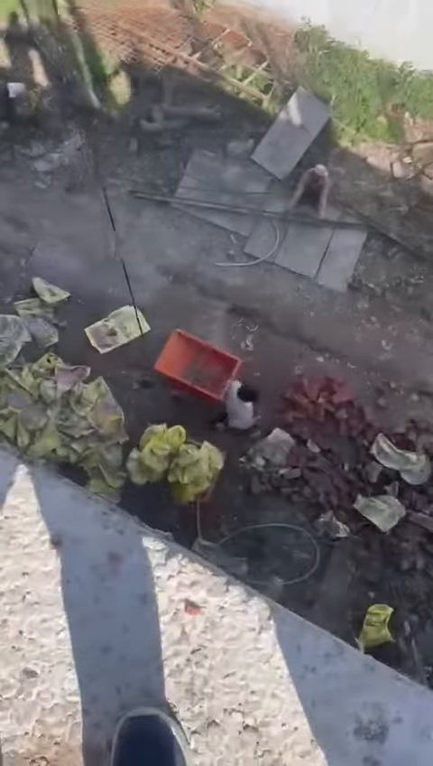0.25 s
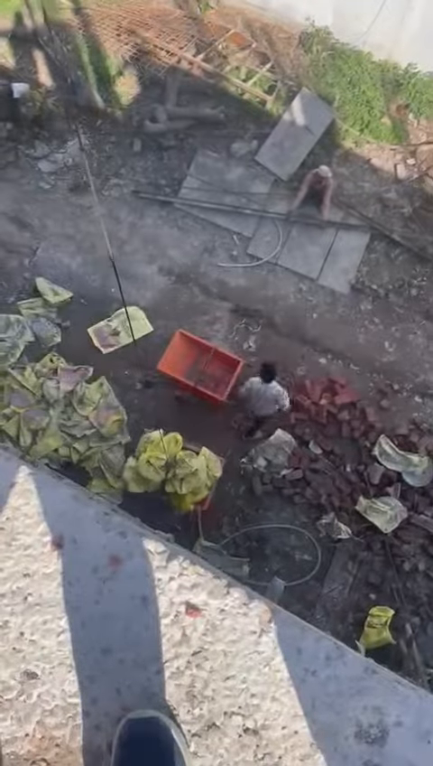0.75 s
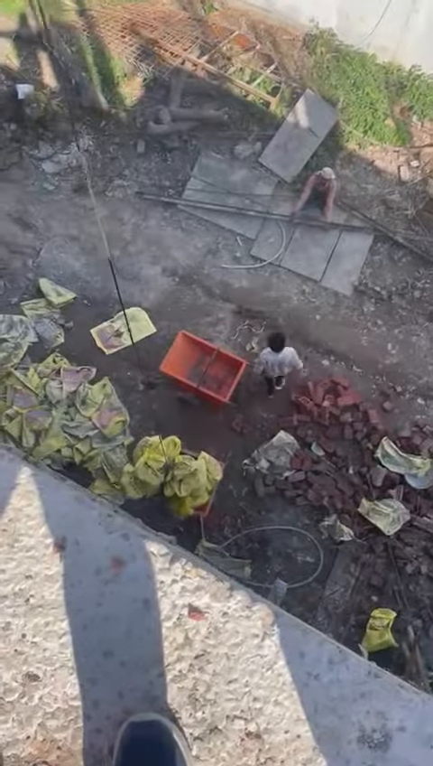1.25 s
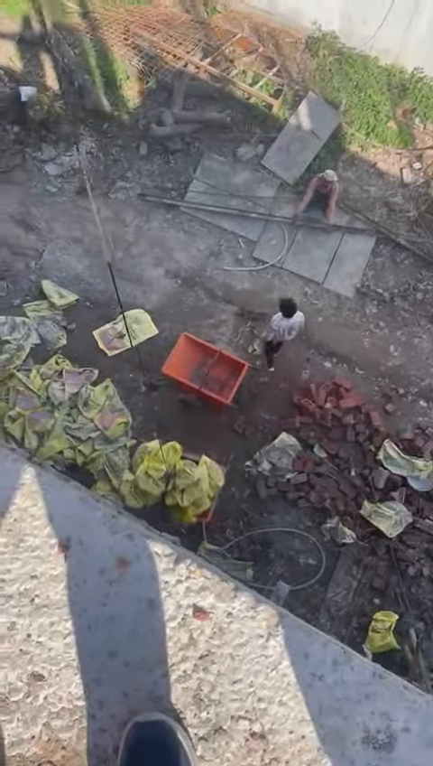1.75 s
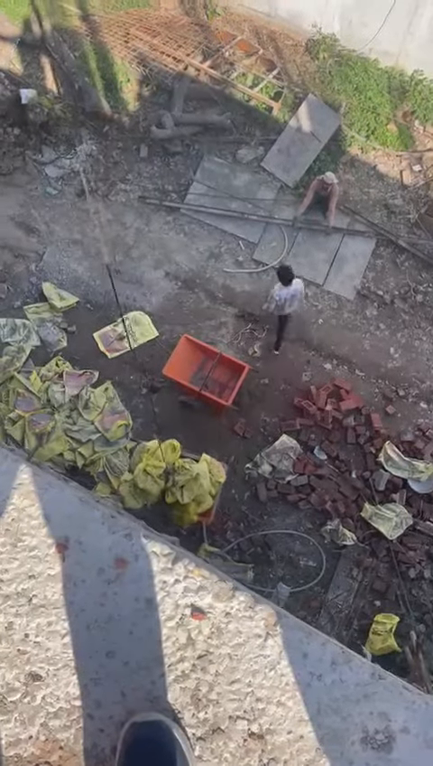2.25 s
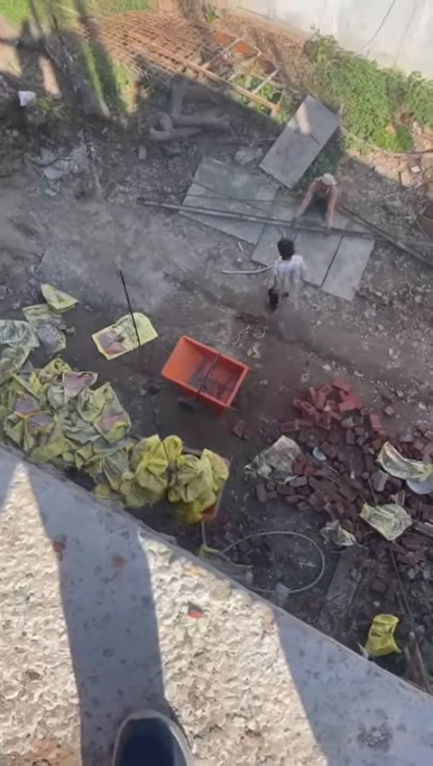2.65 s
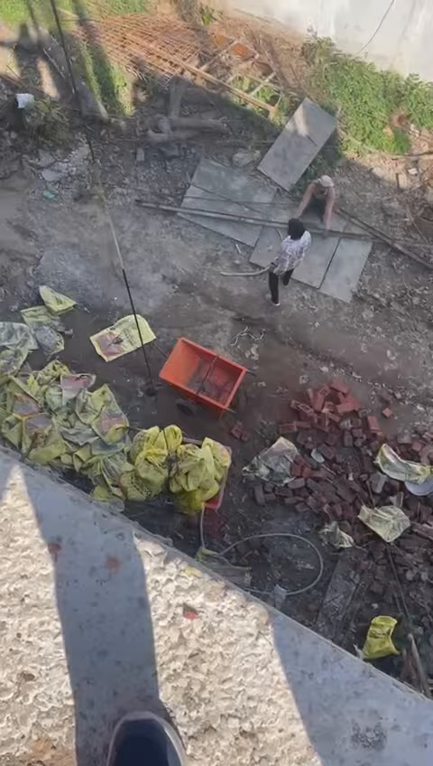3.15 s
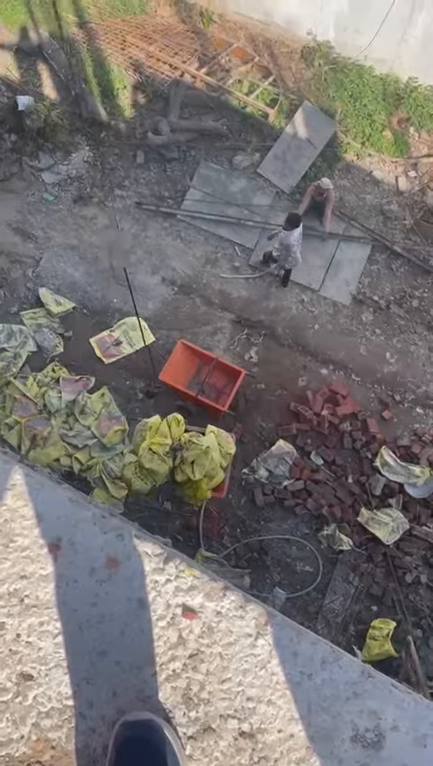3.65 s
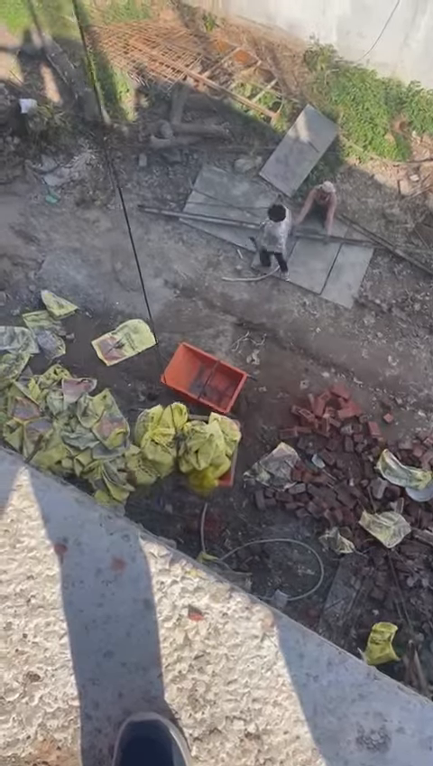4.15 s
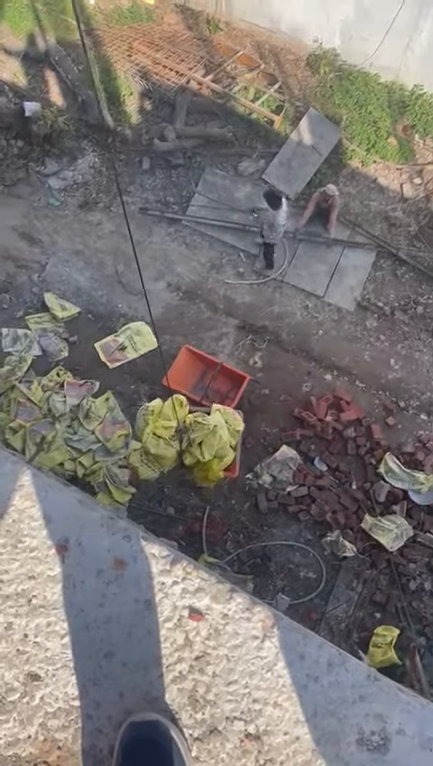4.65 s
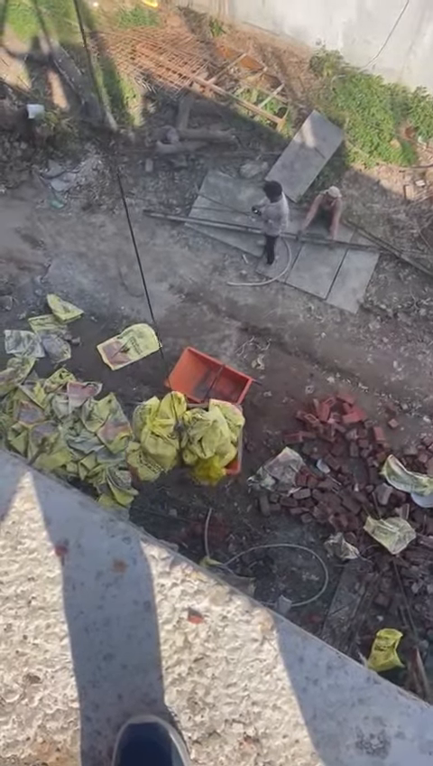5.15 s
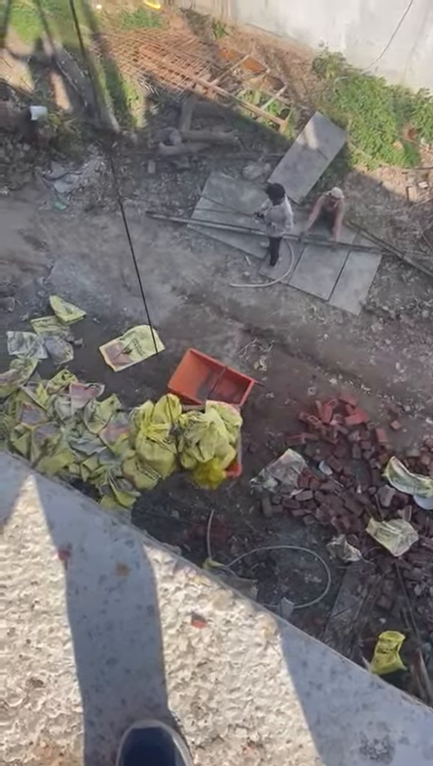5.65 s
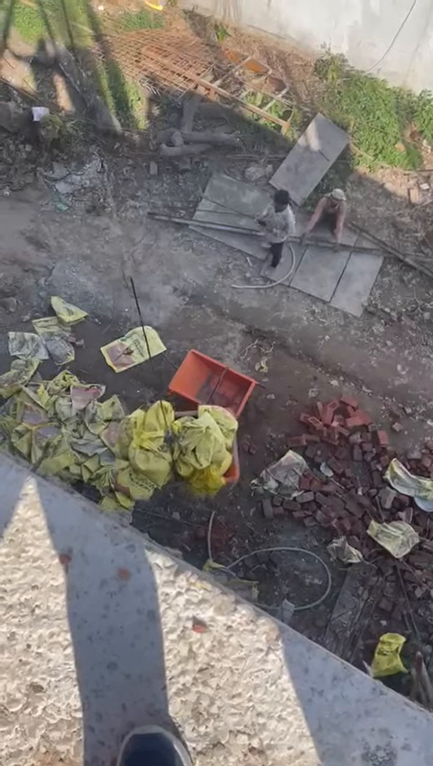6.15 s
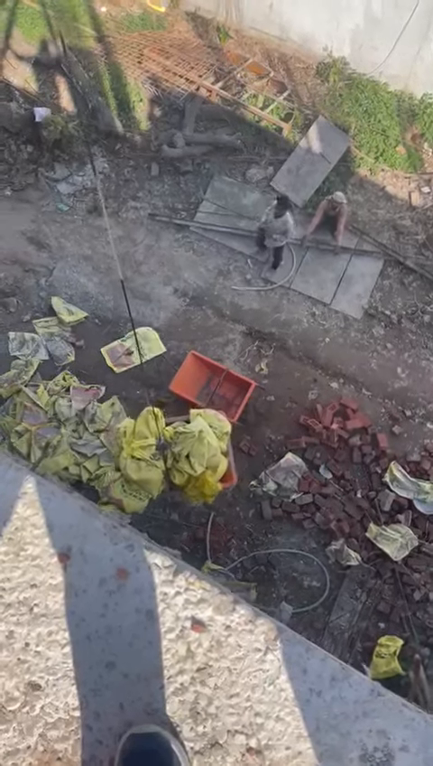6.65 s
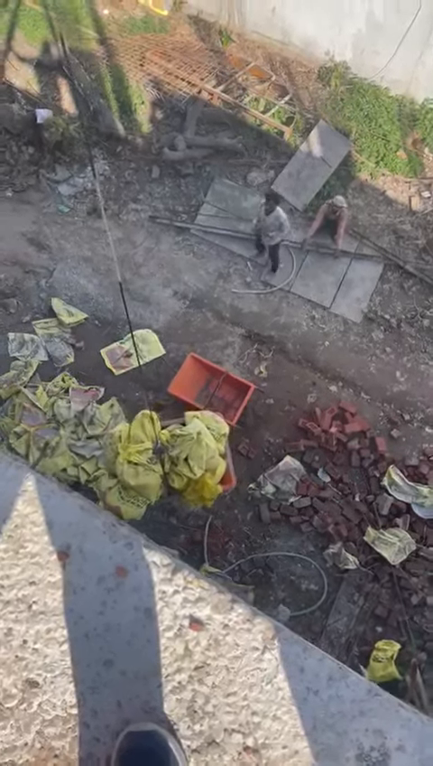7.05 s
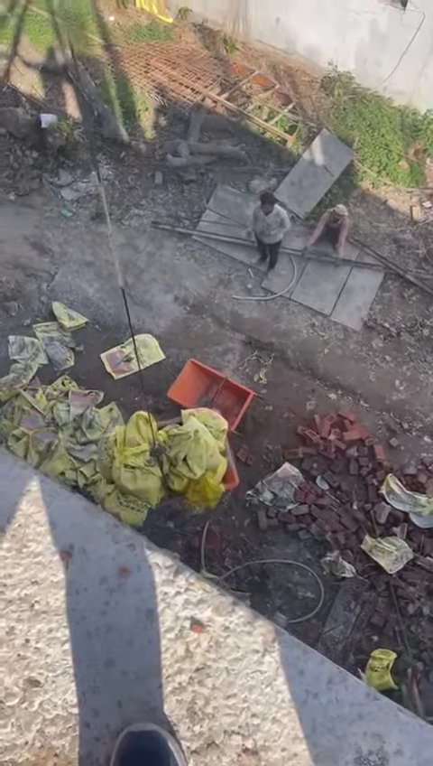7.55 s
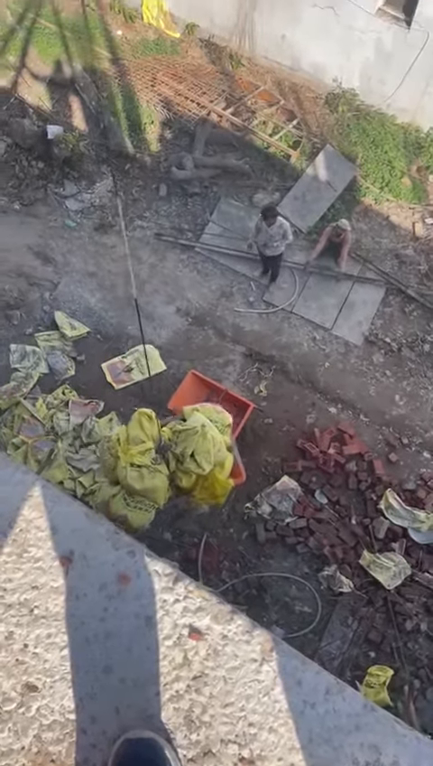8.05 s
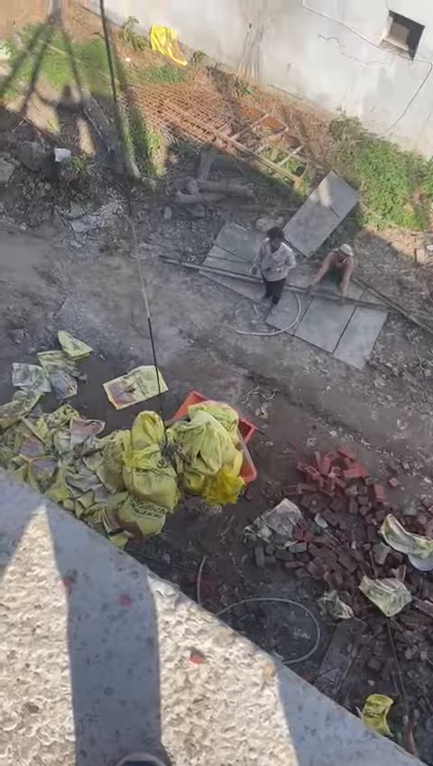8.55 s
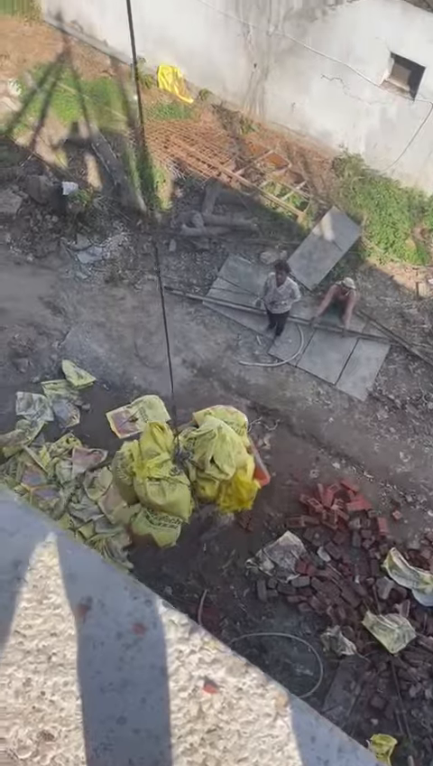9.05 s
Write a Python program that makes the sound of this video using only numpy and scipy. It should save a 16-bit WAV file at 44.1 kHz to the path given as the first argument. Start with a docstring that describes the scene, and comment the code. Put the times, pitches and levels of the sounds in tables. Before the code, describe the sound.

At an open roof edge above a building site, a small electric hoist winds up a load. Its low hum, gear whine and hiss run throughout and grow louder. The rope rustles and ticks, roughest about once a second. Light knocks ring the steel frame; later come wind thumps, a brief creak and one strong clank. The stereo microphone is close and slightly dull at the top.

```python
"""Roof edge of a building, where an electric hoist winds up a load: the motor hums on its shaft orders, gear
noise hisses and whines, and the steel frame drones as resonant noise. The rope rustles, ticks and scrapes,
roughest once a drum turn, and creaks once; blows ring the frame. Low-frequency noise in gusts and crosswind
buffets a two-port microphone; a cut leaves one click."""
import sys
import numpy as np
from scipy import signal
from scipy.fft import rfft, irfft, next_fast_len
from scipy.io import wavfile
from scipy.ndimage import uniform_filter1d, map_coordinates

SR = 44100
rng = np.random.default_rng(int(sys.argv[2]) if len(sys.argv) > 2 else 0)


def boost_factor(decibels):
    """Convert a level in decibels to a linear amplitude factor."""
    exponent = np.asarray(decibels, float) / 20
    return 10 ** exponent


def dump_mix(stems):
    """Bounce the given channels to the path in sys.argv[1] as a 16-bit WAV at rate SR."""
    frames = np.atleast_2d(stems).T  # one column per channel
    limited = np.clip(frames, -1, 1)  # hard clip at full scale
    pcm = np.round(limited * 32767).astype(np.int16)
    wavfile.write(sys.argv[1], SR, pcm)


N = 409688
TIME_S = np.arange(N) / SR
SHAFT_HZ = 24.51


def unit(x):
    """Scaled to rms 1."""
    return x / np.sqrt(np.mean(x ** 2) + 1e-20)


def curve(rows):
    """(time [s], value) rows joined to one value per sample."""
    s, values = np.transpose(rows)
    return np.interp(TIME_S, s, values)


def along(hz_points, values, hz):
    """Values joined on a log-frequency axis."""
    return np.interp(np.log(hz + 1), np.log(np.asarray(hz_points) + 1), values)


def wobble(knots_per_s):
    """Smooth random curve through normal-distributed knots."""
    return map_coordinates(rng.standard_normal(SR // 50), [TIME_S * knots_per_s], mode="wrap")


def filtered(x, response):
    """x times a complex response of frequency [Hz]."""
    m = next_fast_len(N + SR // 2)
    return irfft(rfft(x, m) * response(np.fft.rfftfreq(m, 1 / SR)), m)[..., :N]


def resonances(table):
    """Causal response of second-order resonances (centre [Hz], width [Hz], level [dB])."""
    def response(f):
        total = 0
        for k, (hz, width_hz, db) in enumerate(table):
            # alternating signs avoid notches between neighbours
            total = total + (-1) ** k * boost_factor(db) * 1j * f * width_hz / (hz * hz - f * f + 1j * f * width_hz)
        return total
    return response


def patchy(depth_db):
    """Two unrelated noises under one time-frequency field of random gain patches."""
    z = signal.stft(rng.standard_normal((2, N)), nperseg=512)[2]
    field = uniform_filter1d(rng.standard_normal(z.shape[1:]), size=5, axis=0)
    field = uniform_filter1d(field, size=10, axis=1)
    return signal.istft(z * boost_factor(depth_db * unit(field)), nperseg=512)[1][:, :N]


def swells(s, db, rise_s, hold_s, fade_s):
    """Gains, summed as power, that climb to a peak, hold and fade; rise and fade take 20 dB."""
    t = np.arange(0, N, 32) / SR - np.asarray(s)[:, None]
    rise_s, hold_s, fade_s = (np.reshape(v, (-1, 1)) for v in (rise_s, hold_s, fade_s))
    down = np.maximum(-t, 0) / rise_s + np.maximum(t - hold_s, 0) / fade_s
    gains = boost_factor(np.reshape(db, (-1, 1)) - 20 * down)
    return np.repeat(np.linalg.norm(gains, axis=0), 32)[:N]


def even(x):
    """Noise with its chance swells flattened."""
    smooth_s = .05
    power = uniform_filter1d(x ** 2, size=round(smooth_s * SR))
    return unit(x / np.sqrt(np.abs(power) + .1))


def rough_spot():
    """0-1: the rope runs rough once per turn of its drum."""
    turn_s, first_peak_s, sharpness = 1.2, .3, 2.5
    turn = (TIME_S - first_peak_s) / turn_s
    return np.exp(sharpness * (np.cos(2 * np.pi * turn) - 1))


def motor(hiss_db):
    """Sines on shaft orders share one slightly unsteady turn; whines wander in phase and level."""
    # low orders' hum: (time [s], level [dB])
    hum_level = [(0, -35), (2, -33.5), (3.1, -31.5), (3.5, -29), (5, -26), (6.4, -25), (6.85, -25),
                 (6.95, -36), (8, -32), (8.4, -28.5), (8.8, -29.5), (9.05, -34), (9.29, -25)]
    # (shaft order, level [dB re hum below order 5, else re raised gear level], waver [dB])
    orders = [(3, 0, 1.1), (4, -14, 3), (10, -18, 4), (11, -18, 4), (15, -15, 3), (20, -25, 4),
              (21, -25, 4), (24, -27, 4)]
    # shaft order 9: (time [s], level [dB])
    ninth_level = [(0, -39), (.3, -46), (1.5, -50), (2.6, -42), (3, -50), (3.6, -44), (4.5, -38), (5, -42),
                   (5.25, -33), (5.4, -38), (5.58, -30), (5.75, -37), (6.65, -36), (7.1, -45), (7.7, -44),
                   (8.15, -35), (8.6, -41), (9.29, -37)]
    # gears and winding: (centre [Hz], level [dB re gear level], wander [knots/s])
    whine_rows = [(323, -5, 7), (354.5, -1.5, 10), (419.5, 3, 9), (587, -13, 10), (632, -16, 12),
                  (675, -15, 12), (829, -12.5, 8), (856, -15, 8), (920, -17, 12), (1086, -19.5, 8),
                  (1194, -20, 20), (1393, -21, 12), (1580, -17, 25), (1653, -20.5, 7), (2012, -21, 12),
                  (2078, -20, 20), (2649, -17.5, 16), (2767, -22, 25), (2930, -24, 25), (3112, -26, 20),
                  (3601, -26, 12), (3930, -28, 30), (4296, -21, 10), (4823, -29, 12)]
    upper_orders_db = 13.5  # raise of orders from 5 up, re gear level
    turn = 2 * np.pi * (SHAFT_HZ * TIME_S + 0.0018 * wobble(2.8))
    hum_db = curve(hum_level)
    hum = boost_factor(curve(ninth_level) + 2.5 * wobble(5)) * np.sin(9 * turn)
    for order, db, waver_db in orders:
        base_db = hum_db if order < 5 else hiss_db + upper_orders_db
        level = boost_factor(base_db + db + waver_db * wobble(5))
        hum += level * np.sin(order * turn + rng.uniform(0, 6.9))
    whine = np.zeros(N)
    for hz, db, knots_per_s in whine_rows:
        phase = 2 * np.pi * hz * TIME_S + 1.36 * wobble(knots_per_s)
        whine += boost_factor(db + 4.5 * wobble(knots_per_s)) * np.sin(phase)
    return np.sqrt(2) * (hum + boost_factor(hiss_db) * whine)


def drone(frame_db, hiss_db):
    """Running noise shakes the frame's resonances; gear hiss throbs a little once a shaft turn."""
    # frame: (centre [Hz], width [Hz], level [dB])
    frame_modes = [(160, 78, -17), (235, 50, -9), (358, 44, -2), (427, 40, -1.5), (490, 100, -7.5),
                   (690, 100, -13), (755, 70, -11), (855, 90, -15)]
    # hiss spectrum: (frequency [Hz], relative level [dB])
    hiss_shape = [(300, -20), (700, -3.5), (1200, 0.5), (1900, -6), (2500, -8.5), (3300, -10.5),
                  (4300, -12.5), (5000, -19.5), (6400, -18.5), (7500, -32.5), (9200, -29.5), (11000, -21.5),
                  (12000, -37)]
    # gearbox peaks on the hiss: (centre [Hz], width [Hz], level [dB])
    gearbox_modes = [(1543, 37, -10.5), (2033, 64, -7.5), (2340, 70, -1), (2724, 200, 5), (4140, 50, -3.5)]

    def hiss_response(f):
        peaks = 1 + sum(boost_factor(db) / (1 + (2 * (f - hz) / width_hz) ** 2) for hz, width_hz, db in gearbox_modes)
        return boost_factor(along(*np.transpose(hiss_shape), f)) * peaks

    throb = np.sin(2 * np.pi * SHAFT_HZ * TIME_S)
    frame = unit(filtered(patchy(1.95), resonances(frame_modes)))
    hiss = unit(filtered(patchy(2.1), hiss_response))
    hiss_gain = boost_factor(hiss_db + 1.0 + 0.69 * throb + 0.94 * wobble(8))
    return boost_factor(frame_db + 0.7) * frame + hiss_gain * hiss


def rustle(gear_db, spot):
    """Grit under the rope: sparse noise grains, louder at the rough spot and in scrapes."""
    # (time [s], level [dB before +2], fade by 20 dB [s])
    scrapes = [(.23, -59, .12), (1.65, -59, .3), (2.78, -50, .07), (3.75, -49, .05), (3.96, -56, .3),
               (5.22, -53, .4), (5.85, -44.5, .07), (6.13, -47, .09), (6.34, -38.5, .07), (6.44, -48, .05),
               (6.54, -45.5, .11), (7.42, -50, .08), (7.58, -41, .085), (7.84, -44.5, .065),
               (7.92, -48, .06), (8.585, -45, .06)]
    # colour: (centre [Hz], width [Hz], level [dB])
    rustle_modes = [(2510, 980, 0), (5600, 2200, 1), (8200, 3900, -6), (10600, 1400, -19)]
    level_db, spot_db = -15.5, 2  # re gear level, before +2; swell at the rough spot
    rise_per_fade = .55
    s, db, fade_s = np.transpose(scrapes)
    level = boost_factor(gear_db + level_db + spot_db * spot) + swells(s, db, rise_per_fade * fade_s, 0, fade_s)
    sparse = rng.random((2, N)) < 700 / SR  # 700 grains/s
    grit = unit(sparse * rng.standard_normal((2, N)) + 0.092 * rng.standard_normal((2, N)))
    return boost_factor(2) * level * unit(filtered(grit, resonances(rustle_modes)))


def small_ticks(gear_db, spot):
    """Random weak ticks, thinned so that they crowd the rough spot."""
    peak_per_s, level_db, spread_db = 10, 5, 1.5  # rate at the spot; level re gear level
    when, keep, size, tone = rng.random((SR // 200, 4)).T
    at = (when * N).astype(int)
    db = gear_db[at] + level_db - spread_db * np.log(size + .01)
    rows = np.transpose([at / SR, db, 8 * tone - 5])
    return rows[keep * len(at) * SR / N < peak_per_s * spot[at]]


def ticks(gear_db, spot):
    """Short three-band noise bursts, each with a faint rattle; also returns an in-step part of the loudest."""
    # (time [s], level [dB before +4.5], low band [dB re middle band])
    loud_ticks = [(0.1037, -39, -2), (0.2314, -38, 4), (0.4025, -36, 2), (0.4254, -31.5, -2),
                  (1.2187, -41, -2), (1.252, -40, -6), (1.2801, -41, -2), (1.3434, -40, -3),
                  (1.5325, -39, -3), (1.6018, -39, -3), (1.6472, -32, -2), (1.713, -40, -4),
                  (1.744, -40, -4), (2.4179, -36, -4), (2.6983, -36.5, -4), (2.7771, -36, -7),
                  (3.7397, -26, -1), (3.9218, -35, 7), (4.0321, -29.5, 0), (4.1154, -33, 0),
                  (4.6586, -35.5, 2), (4.9405, -33, -5), (5.0717, -31, -1.5), (5.2303, -28, 2),
                  (5.3136, -31.5, 2), (6.1163, -31, 8), (6.123, -33, 6), (6.2974, -31.5, -4.5),
                  (6.3248, -32, 4), (6.345, -32, 8), (6.368, -33, 2), (6.4466, -25.5, 0), (6.5414, -31, -4),
                  (6.5982, -32, -1), (7.2862, -32, 1), (7.35, -30.5, -3), (7.4049, -29.5, -3),
                  (7.5082, -22.5, 0), (7.552, -29, -5), (7.5675, -26, -3), (7.58, -26, -5),
                  (7.6194, -27.5, 0), (7.8214, -33, -3), (7.9072, -24, -3), (8.5752, -21, -4.5),
                  (8.6301, -25, -11), (9.2198, -31.5, -7)]
    # low, middle and two high bands: (centre [Hz], width [Hz], level [dB])
    tick_modes = [(2650, 1100, 5), (5400, 1300, 0), (7440, 4100, -5), (10100, 1400, -21)]
    high_at_35_db, high_tilt = -10.5, -.25  # high band at level -35 dB; louder ticks are duller
    front_db, front_from_db = -8, -27  # in-step part; tick level above which it is added
    parts = np.zeros((3, N + SR))
    t = np.arange(SR // 20) / SR
    decay = boost_factor(-60 * t / 0.0065) + 0.22 * boost_factor(-60 * t / .08)  # burst and rattle
    for s, db, low_db in [*loud_ticks, *small_ticks(gear_db, spot)]:
        high_db = high_at_35_db + high_tilt * (db + 35)
        gains = boost_factor(db + 4.5 + np.array([[low_db], [0], [high_db]]))
        parts[:, round(s * SR):][:, :len(t)] += gains * rng.standard_normal((3, len(t))) * decay
    low, middle, *high = tick_modes
    bands = ([low], [middle], high)
    sound = sum(filtered(x[:N], resonances(band)) for x, band in zip(parts, bands))
    loudest_s = [s for s, db, _ in loud_ticks if db > front_from_db]
    gate = swells(loudest_s, np.full(len(loudest_s), front_db), .001, .01, .02)
    return sound, sound * gate


def knocks():
    """Every blow rings the frame's modes at new strengths; a dull thud blooms behind it."""
    # (time [s], level [dB before -7 ring, +3 thud], modes of 1-3 kHz [dB])
    blows = [(0.107, -19, 2), (0.406, -24, 4), (2.769, -27, 0), (3.923, -21, 5), (4.955, -25, 0),
             (5.15, -24, 8), (6.125, -20, 2), (6.327, -19, 3), (7.9105, -4.5, -6), (7.947, -16, -3),
             (7.989, -15, 0)]
    # (mode [Hz], level [dB], t60 [s])
    steel_modes = [(345, -5, .3), (397, 3, .16), (432, -8, .25), (540, -12, .2), (678, -9, .18),
                   (830, -14, .18), (1130, -19, .15), (1324, -19, .12), (1560, -16, .2), (2400, -19, .12),
                   (3570, -28, .2), (3615, -20, .3)]
    ring_attack_s, thud_attack_s, thud_t60_s, thud_db = .0015, .012, .33, 3
    rings, thuds = np.zeros((2, N + SR))
    t = np.arange(SR // 2) / SR
    thud_shape = boost_factor(-60 * t / thud_t60_s) * (1 - np.exp(-t / thud_attack_s))
    for s, db, high_db in blows:
        ring = np.zeros(len(t))
        for hz, level_db, t60_s in steel_modes:
            mode_db = level_db + high_db * (1000 < hz < 3000) + rng.normal(0, 1.2)
            ring += boost_factor(mode_db - 60 * t / t60_s) * np.sin(2 * np.pi * hz * t)
        start = round(s * SR)
        rings[start:][:len(t)] += boost_factor(db - 7) * ring * (1 - np.exp(-t / ring_attack_s))
        thuds[start:][:len(t)] += boost_factor(db + thud_db) * thud_shape * rng.standard_normal(len(t))
    dull = resonances([(450, 700, 0)])
    return rings[:N] + filtered(thuds[:N], lambda f: dull(f) ** 3)


def creak():
    """Quick, slightly uneven slips fade as they ring four resonances."""
    # (start [s], end [s], slips [1/s], peak [dB])
    creak_row = (7.655, 7.75, 230, -21)
    start_s, end_s, slips_per_s, db = creak_row
    at_s = np.arange(start_s, end_s, 1 / slips_per_s)
    uneven_s = at_s + .0001 * rng.standard_normal(len(at_s))
    slips = np.zeros(N)
    slips[(uneven_s * SR).astype(int)] = boost_factor(-60 * (at_s - start_s) / 0.92)
    ring = filtered(slips, resonances([(460, 80, 2.5), (680, 130, -2), (1390, 150, -15), (3480, 80, -15)]))
    return boost_factor(db) * ring / np.max(np.abs(ring))


def air_band(x, low_hz, top_hz):
    """Noise kept between two gentle band edges, at rms 1."""
    return unit(filtered(x, lambda f: 1 / (1 + (low_hz / (f + 1)) ** 5) / (1 + (f / top_hz) ** 4.68)))


def wind():
    """Lumpy low pressure noise: gusts, flutter and breeze alike at both ports, crosswind opposed."""
    # (time [s], level [dB before +1.5], rise by 20 dB [s], fade by 20 dB [s])
    gust_rows = [(2.06, -37, .1, .4), (3.168, -37.5, .055, .26), (5.12, -30, .32, .2),
                 (5.505, -23, .05, .08), (6.0, -37, 1.5, .5), (6.26, -21, .06, .05), (6.315, -16, .07, .1),
                 (6.52, -26, .03, .4), (6.59, -23, .06, .06), (6.66, -17, .06, .06), (6.712, -13, .05, .04),
                 (6.74, -16, .03, .05), (6.872, -21, .1, .06), (7.08, -30, .09, .12), (7.53, -37, .17, .8),
                 (8.052, -32, .25, .04), (8.166, -30, .1, .08), (8.5, -38, 1.5, .5),
                 (8.64, -20.5, .06, .08), (8.74, -22, .08, .1), (8.84, -26, .08, .1), (6.22, -24, .05, .06)]
    # brighter: (time [s], level [dB], rise by 20 dB [s], fade by 20 dB [s])
    flutter_rows = [(6.26, -26, .08, .05), (6.315, -23, .05, .06), (6.64, -30, .1, .1),
                    (6.712, -22, .05, .06), (6.742, -23, .03, .03), (6.775, -19, .008, .08),
                    (6.805, -20, .06, .08), (6.835, -20, .06, .09), (8.7, -35, .2, .2)]
    # (time [s], level [dB before -0.5], hold [s])
    crosswind_rows = [(.13, -43, .08), (.52, -39, .01), (.6, -46, .1), (4.88, -44, .05), (5.2, -33, .01),
                      (5.8, -36, .05), (5.92, -29, .01), (6.1, -32, .15), (6.32, -27, .01),
                      (6.45, -31.5, .35), (7.78, -30, .48), (8.4, -35.5, .12), (8.73, -23, .23),
                      (9.05, -31, .08), (9.2, -39, .1)]
    breeze_db, calm_db, thump_db = -41, -60, -15  # calm: crosswind floor; thump: its deep lumps
    cross_rise_s, cross_fade_s = .1, .1
    s, db, rise_s, fade_s = np.transpose(gust_rows)
    gust = swells(s, db, rise_s, 0, fade_s)
    s, db, rise_s, fade_s = np.transpose(flutter_rows)
    flutter = swells(s, db, rise_s, 0, fade_s)
    s, db, hold_s = np.transpose(crosswind_rows)
    push = boost_factor(calm_db) + swells(s, db, cross_rise_s, hold_s, cross_fade_s)
    breeze = boost_factor(breeze_db + 2.4 * wobble(5.1))
    head, cross = rng.standard_normal((2, N)) * boost_factor(2.6 * np.array([wobble(30), wobble(25)]))
    alike = boost_factor(1.5) * gust * even(air_band(head, 46, 180))
    alike += breeze * air_band(head, 35, 170)
    alike += flutter * even(air_band(head, 220, 420))
    thump = boost_factor(thump_db + 3.5 * wobble(12)) * air_band(cross, 36, 100)
    opposed = boost_factor(-.5) * push * (air_band(cross, 90, 480) + thump)
    return np.array([alike + opposed, alike - opposed])


def click():
    """A click: a sudden step in the signal, left by a cut, that dies at once."""
    # (time [s], peak [dB], decay time constant [s])
    click_row = (3.198, -16.5, .001)
    s, db, fall_s = click_row
    t = TIME_S - s
    return boost_factor(db) * (t >= 0) * np.exp(-np.abs(t) / fall_s)


def ports(direct, pair):
    """Each port hears the sound with its own phase and level; part of the noise is not shared."""
    # (frequency [Hz], left lead [rad], noise likeness [0-1], left-right level [dB])
    port_rows = [(60, 0, .98, -.3), (200, 0, .92, -1.2), (400, .05, .8, -2.5), (800, .05, .85, -2.2),
                 (1200, .03, .93, -1.7), (1900, .14, .87, -1.3), (2400, 1.2, .7, -1.4), (3300, 2.3, .7, -1),
                 (3900, 1.9, .55, 1), (4450, 2.4, .6, 2), (4750, 1.2, .1, 1.6), (5300, .3, .85, 1.7),
                 (6000, 1.2, .7, .4), (6400, 2.3, .85, 0), (6800, 3.05, .995, 0), (8700, 3.2, .995, 0),
                 (9800, 6, .8, 0), (10600, 6.28, .96, 0), (11300, 6.28, .995, 0)]
    hz, lead_rad, alike, balance_db = np.transpose(port_rows)
    side = np.array([[.5], [-.5]])

    def shift(f):
        return boost_factor(side * along(hz, balance_db, f)) * np.exp(1j * side * along(hz, lead_rad, f))

    def share(f):
        angle = np.arccos(np.clip(along(hz, alike, f), 0, 1)) / 2
        return np.array([np.cos(angle), np.sin(angle)])

    shared, own = filtered(pair, share)
    return filtered(direct + np.array([shared + own, shared - own]), shift)


def scene():
    """Hoist, blows and wind at the two ports."""
    # running level of the gears: (time [s], level [dB])
    gear_level = [(0, -47), (1.97, -49), (3.7, -45), (4.6, -43.3), (6.52, -41.5), (6.95, -42.5),
                  (7.25, -42.5), (7.79, -39), (8.33, -41.5), (9.29, -42)]
    frame_offset_db, frame_growth = 8.5, 1.1  # frame over gears; it swings wider
    spot_frame_db, spot_hiss_db = 2.5, 1.5  # swell at the rough spot
    gear_db, spot = curve(gear_level), rough_spot()
    mean_db = gear_db.mean()
    hiss_db = gear_db + spot_hiss_db * spot
    frame_db = mean_db + frame_offset_db + frame_growth * (gear_db - mean_db) + spot_frame_db * spot
    tick, front = ticks(gear_db, spot)
    direct = motor(hiss_db) + tick + knocks() + creak()
    noise = drone(frame_db, hiss_db) + rustle(gear_db, spot)
    return ports(direct, noise) + front + wind()


def band_limit(x):
    """A steep low-pass at the top of the band."""
    return signal.sosfilt(signal.butter(12, 16400, fs=SR, output="sos"), x)


def record(dry):
    """A steep low-pass near 12 kHz dulls the sound; the click of the cut is added after it."""
    top_hz, top_db, slope_hz = 12050, -70, 90
    heard = filtered(dry, lambda f: boost_factor(top_db / (1 + np.exp((top_hz - f) / slope_hz))))
    return band_limit(heard + click())


dry = scene()
out = record(dry)
dump_mix(out)
```